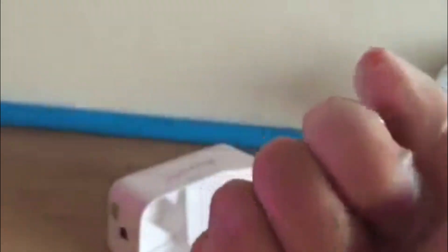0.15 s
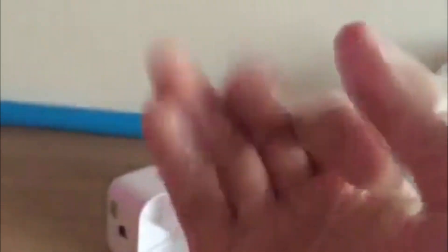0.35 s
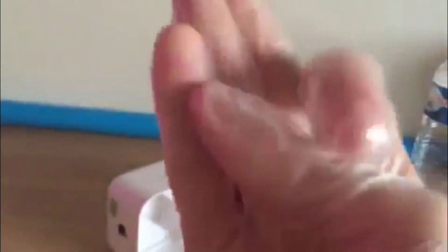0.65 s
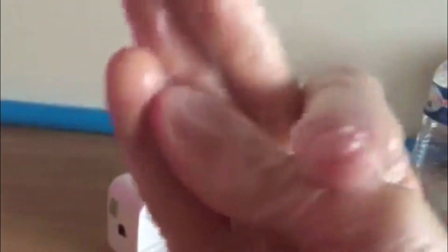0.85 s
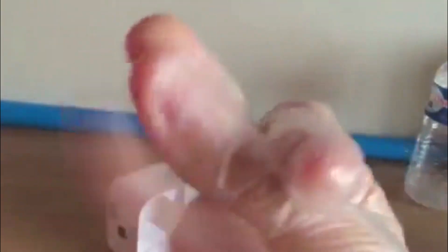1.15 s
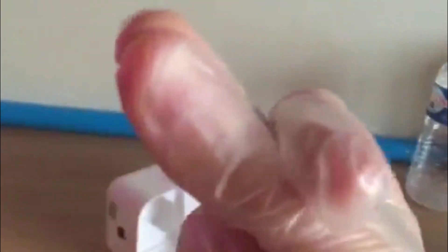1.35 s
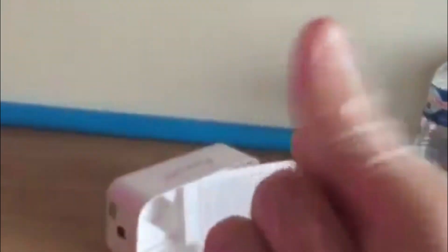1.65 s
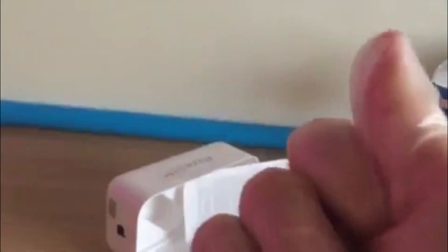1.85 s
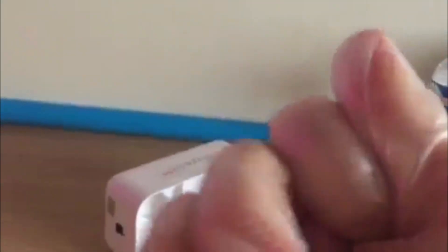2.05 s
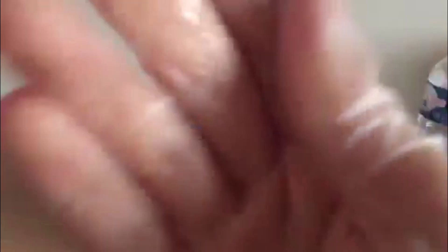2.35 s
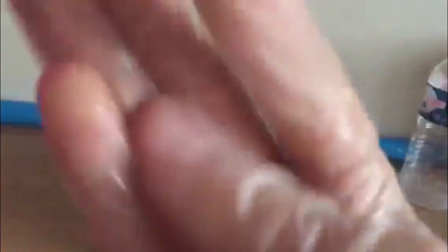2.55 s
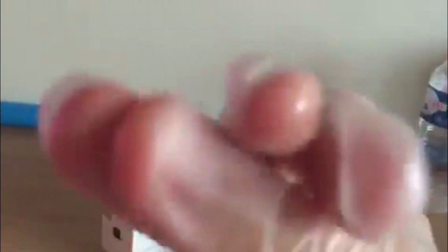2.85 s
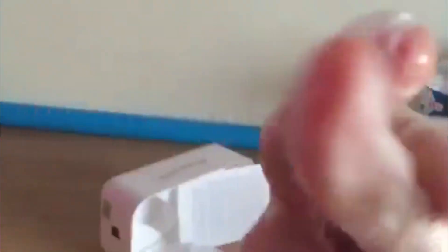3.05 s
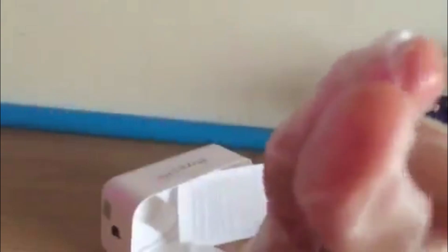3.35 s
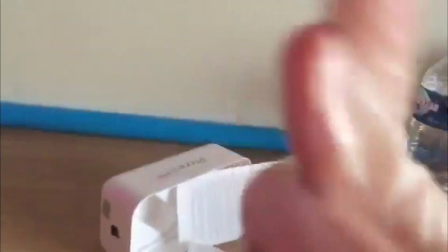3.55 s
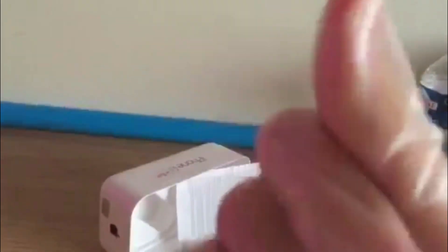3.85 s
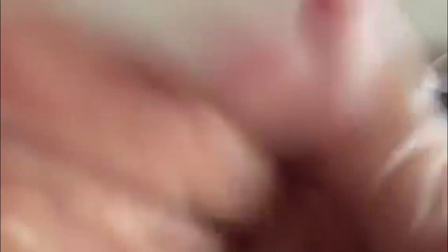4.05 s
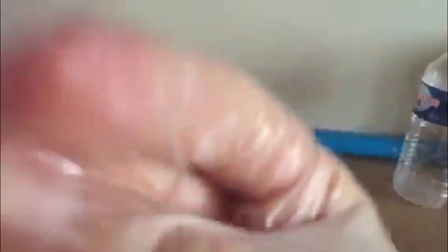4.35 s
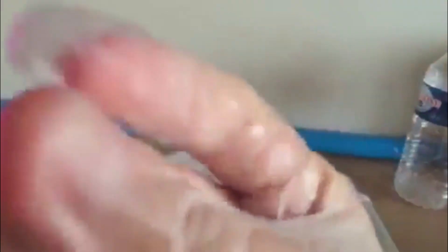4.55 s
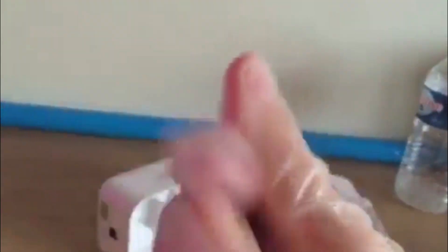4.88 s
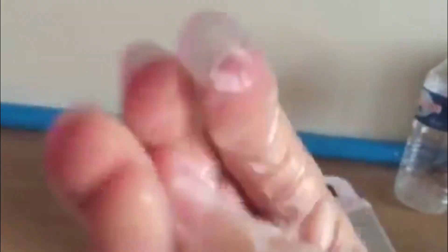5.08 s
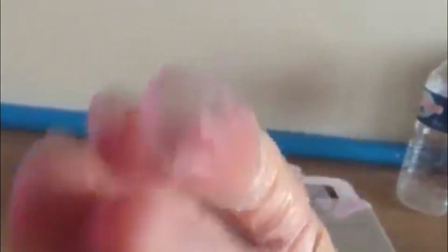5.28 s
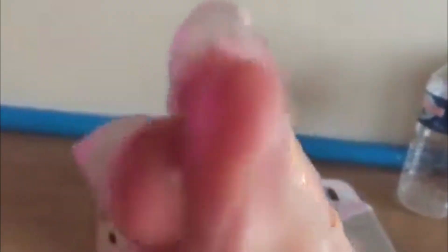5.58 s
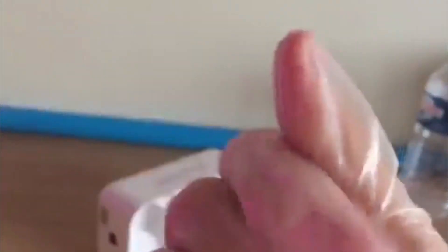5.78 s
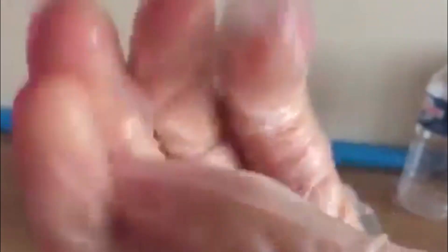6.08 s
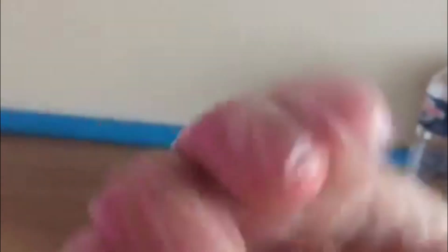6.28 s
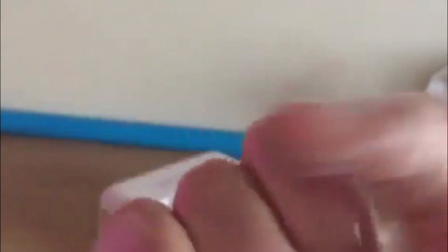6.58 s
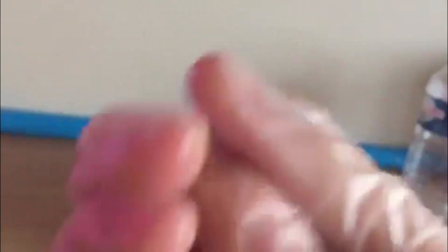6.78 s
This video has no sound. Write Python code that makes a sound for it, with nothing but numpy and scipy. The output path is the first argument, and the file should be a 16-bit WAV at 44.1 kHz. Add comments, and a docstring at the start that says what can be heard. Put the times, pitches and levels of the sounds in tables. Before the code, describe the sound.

Very close to a small phone microphone, fingers in a loose thin plastic glove rub and flick one another. Short swishes of bright, grainy rustle come in uneven bursts, with sharp crackly snaps and occasional low puffs of air. The loudest flick comes about a third of the way in; later the rubbing becomes more continuous. A small quiet room adds faint hum and a short echo.

```python
"""A hand in a thin plastic glove rubs and flicks its fingers close to a phone microphone.
Film slides on film in countless tiny slips: noise with moving level and colour, ringing near 2 kHz in
the cupped palm. Flicks are bursts of the slips, creases snap as decaying sines with a noise tick, and
a finger that lets go pushes a puff of air at the microphone: a low thump, a damped swing of falling
pitch. Room noise and a faint fan hum lie beneath; the hand has a short echo."""
import sys
import numpy as np
from scipy import signal
from scipy.fft import rfft, irfft, next_fast_len
from scipy.io import wavfile
from scipy.ndimage import uniform_filter1d, map_coordinates

SR = 44100
rng = np.random.default_rng(int(sys.argv[2]) if len(sys.argv) > 2 else 0)


def put_to_file(sound):
    """Save the sound as 16-bit audio at rate SR, in the file named by the first command-line argument."""
    columns = np.atleast_2d(sound).T  # one column per channel
    safe = np.clip(columns, -1, 1)
    whole_steps = np.round(safe * 32767)
    wavfile.write(sys.argv[1], SR, whole_steps.astype(np.int16))


N = 305172


def amp(db):
    """Decibels to gain."""
    return 10 ** (np.asarray(db) / 20)


def unit(x):
    """Scale to rms 1."""
    return x / np.sqrt(np.mean(x ** 2) + 1e-20)


def filtered(x, response):
    """Multiply the spectrum of x by response(frequency in Hz)."""
    m = next_fast_len(N + 8192)
    spectrum = rfft(x, m) * response(np.fft.rfftfreq(m, 1 / SR))
    return irfft(spectrum, m)[..., :N]


def colour(points):
    """Gain curve through (frequency [Hz], gain [dB]) points on a log axis."""
    point_hz, gain_db = np.transpose(points)
    return lambda hz: amp(np.interp(np.log(hz + 1), np.log(point_hz + 1), gain_db))


def wobble(knots_per_s):
    """Smooth random curve through normally distributed knots."""
    knots = rng.standard_normal(int(N * knots_per_s / SR) + 4)
    return map_coordinates(knots, [np.arange(N) * knots_per_s / SR])


# room noise spectrum: (frequency [Hz], density [dB per Hz, relative])
ROOM_SPECTRUM = [(25, -8.5), (54, -0.5), (80, -11), (116, -10), (180, -8.5), (270, -5), (350, -8),
                 (450, -19), (730, -18.5), (1200, -19), (1700, -16.5), (2200, -18.5), (2650, -23),
                 (4500, -27), (9500, -31.5), (10500, -33.5), (14500, -38.5), (15800, -47.5)]
# unsteady fan tones: (frequency [Hz], full width at half amplitude [Hz], mean level [dB])
FAN_TONES = [(52, 8, -70), (116.2, 8, -79), (269.2, 14, -69), (548, 4, -87), (1073, 13, -77.5)]


def room_air():
    """Gently wavering room noise plus fan tones, each a narrow band of noise."""
    noise = unit(filtered(rng.standard_normal(N), colour(ROOM_SPECTRUM)))
    out = amp(-64.5 + 1.4 * wobble(2.94)) * noise
    for tone_hz, width_hz, level_db in FAN_TONES:
        tone = filtered(rng.standard_normal(N), lambda f: 1 / (1 + (2 * (f - tone_hz) / width_hz) ** 2))
        out = out + amp(level_db + 0.87 * wobble(6.7)) * unit(tone)
    return out


# puffs of air: (onset [s], peak level [dB], pitch fall [Hz]); pitch ends at 0.44 of the fall
AIR_PUFFS = [(0.056, -52, 100), (1.062, -46.5, 198), (1.255, -42, 102), (1.503, -29.5, 130),
             (1.742, -40.5, 221), (2.315, -20.5, 170), (2.497, -30.5, 121), (2.623, -53, 109),
             (2.798, -41, 153), (2.855, -48, 101), (2.999, -30, 113), (3.568, -48.5, 109),
             (3.803, -55, 111), (4.2, -31.5, 111), (4.425, -49, 100), (4.461, -51, 127), (4.492, -48, 130),
             (4.53, -51.5, 150), (4.698, -36, 175), (5.427, -40.5, 167), (5.711, -47, 128),
             (6.039, -42.5, 108), (6.4, -54, 100), (6.629, -50, 492)]
PUFF_T60_S, PUFF_T60_POWER, PUFF_T60_MIN_S = .12, 2.14, .03  # T60 at 100 Hz; shortening with pitch; limit


def puffs():
    """A low thump: pressure dips, then the microphone rings back in a damped swing of falling pitch."""
    out, t = np.zeros(N + SR), np.arange(SR // 4) / SR
    for onset_s, peak_db, fall_hz in AIR_PUFFS:
        t60_s = max(PUFF_T60_S * (100 / fall_hz) ** PUFF_T60_POWER, PUFF_T60_MIN_S)
        pitch_hz = 0.44 * fall_hz + fall_hz * np.exp(-t / 0.0058)
        swing = -np.sin(2 * np.pi * np.cumsum(pitch_hz) / SR)
        thump = amp(-60 * t / t60_s) * (1 - np.exp(-t / 0.0036)) * swing
        out[round(onset_s * SR):][:len(t)] += amp(peak_db) * thump / np.max(np.abs(thump))
    return out[:N]


# creases that pop: (onset [s], peak level before the bass cut [dB], pitch [Hz])
CREASE_SNAPS = [(0.262, -29.5, 2600), (0.3982, -54, 5700), (0.5231, -47, 6200), (0.526, -38.5, 7800),
                (0.5377, -49, 3600), (0.5657, -47.5, 4400), (1.0054, -42, 2390), (1.105, -43, 2300),
                (1.394, -43, 2100), (1.401, -40, 2200), (1.4386, -45, 3900), (1.4576, -43, 2200),
                (1.4975, -15, 5800), (1.5003, -18, 2250), (1.5045, -15.5, 5870), (1.743, -22, 2030),
                (1.9676, -50, 3300), (2.0257, -41, 5400), (2.2464, -44, 4600), (2.3095, -14, 2840),
                (2.3145, -7, 1440), (2.324, -15.5, 6500), (2.3627, -39, 5900), (2.4012, -34.5, 2650),
                (2.4734, -31, 7400), (2.4943, -21.5, 6400), (2.561, -30, 8000), (2.5694, -38, 4300),
                (2.9555, -35.5, 5470), (2.9974, -17.5, 4150), (3, -24, 3800), (3.0782, -41, 5800),
                (3.4548, -39, 6800), (3.5582, -8, 7100), (3.56, -9.5, 7000), (4.0663, -35, 2400),
                (4.0938, -32, 2300), (4.11, -35, 1200), (4.151, -36, 1200), (4.572, -26, 5700),
                (4.6924, -14.5, 9300), (4.7048, -30.5, 2960), (4.879, -42, 4300), (4.9545, -45, 5500),
                (5.163, -31.5, 2080), (5.427, -21.5, 2400), (5.457, -30.5, 7100), (5.8185, -35, 4500),
                (5.8372, -41, 2300), (6.1719, -43, 8000), (6.3184, -43, 7900), (6.467, -32.5, 2000),
                (6.6607, -23, 2340), (6.7281, -27, 2200), (6.866, -42, 3500)]


def snaps():
    """A crease buckles: a ring of a few cycles and a sharp tick; thin film radiates no bass."""
    out, t = np.zeros(N + SR), np.arange(SR // 100) / SR
    for onset_s, peak_db, hz in CREASE_SNAPS:
        life_s = .0001 + 0.3 / hz
        ring = np.sin(2 * np.pi * hz * t) * np.exp(-t / life_s) * (1 - np.exp(-3 * hz * t))
        sharpness = hz / 12000  # small creases tick, large ones knock
        tick = np.exp(-t / 0.00016) * rng.standard_normal(len(t))
        pop = ring + sharpness * tick
        out[round(onset_s * SR):][:len(t)] += amp(peak_db) * pop / np.max(np.abs(pop))
    return filtered(out[:N], lambda f: (1j * f / (500 + 1j * f)) ** 2)


def slips(spread_db, clump_db):
    """A random slip at every sample, most of them tiny, a few large, in clumps."""
    rank = np.minimum(rng.exponential(size=N), 4)
    clumps = wobble(45) + wobble(300)
    return amp(spread_db * rank + clump_db * clumps) * rng.standard_normal(N)


def patchy(x, depth_db):
    """Folds come and go: the colour changes in broad and narrow patches of time and pitch."""
    z = signal.stft(x, nperseg=512)[2]
    broad, narrow = rng.standard_normal((2, *z.shape))
    broad = uniform_filter1d(uniform_filter1d(broad, size=24, axis=0), size=10, axis=1)
    narrow = uniform_filter1d(uniform_filter1d(narrow, size=3, axis=0), size=6, axis=1)
    gain = amp(depth_db * (0.73 * unit(broad) + 0.95 * unit(narrow)))
    return signal.istft(z * gain, nperseg=512)[1][:N]


# film on film, also played by rubbing(): (frequency [Hz], density [dB per Hz, relative])
FILM_SPECTRUM = [(500, -49), (1200, -24.5), (2000, -23), (3000, -1.5), (4500, -1), (6000, 1.5), (9000, 2.5),
                 (10400, -0.5), (11700, 1), (14500, -5), (15200, -8.5), (15800, -14)]
# flesh and palm under a flick: (frequency [Hz], density [dB per Hz, relative])
BODY_SPECTRUM = [(150, -24), (300, -2), (600, -5.5), (1000, -1.5), (2000, 1.5), (3000, -4.5), (4000, -21),
                 (6000, -45.5)]
# stick, tear loose, stop:
# (peak time [s], film level [dB], swell [s], dying [s], body over film level [dB])
FINGER_FLICKS = [(0.099, -37.5, 0.042, .05, -24), (0.651, -37, 0.0099, 0.013, -4.5),
                 (.735, -45.5, 0.038, .02, -2.5), (1.061, -41.5, 0.021, 0.015, -4.5),
                 (1.246, -39, 0.012, 0.014, -6.5), (1.504, -31.5, 0.018, 0.0095, -3.5),
                 (1.743, -41.5, 0.0018, 0.0087, 5.5), (2.309, -29, 0.014, .012, 0.5),
                 (2.313, -31, 0.0028, 0.0089, 9.5), (2.498, -35, .012, 0.018, -5),
                 (2.612, -34, .004, 0.017, -25), (2.798, -38.5, .003, 0.012, -9),
                 (2.846, -52.5, 0.0052, 0.019, 5.5), (3, -38, 0.025, .01, -1),
                 (3.102, -52.5, .002, .012, -18), (3.551, -34, 0.0091, 0.0088, -4),
                 (3.562, -30.5, 0.0046, 0.0093, -6.5), (3.798, -39, 0.0051, 0.013, -6.5),
                 (3.945, -43, 0.013, 0.0065, -22), (4.033, -34.5, 0.014, .01, -16),
                 (4.045, -55.5, 0.0054, 0.0092, 5.5), (4.15, -48, 0.079, 0.048, -0.5),
                 (4.198, -33, 0.029, 0.0049, -7.5), (4.703, -37, 0.013, 0.0071, 2),
                 (5.215, -52, .006, 0.0092, -8), (5.427, -34.5, 0.01, 0.0073, -8),
                 (5.716, -36.5, 0.018, 0.013, -3), (6.034, -38.5, 0.027, .01, -12.5),
                 (6.44, -46, 0.0081, .02, -17), (6.519, -41.5, .003, 0.015, -14),
                 (6.66, -47.5, .004, .008, 4.5), (6.632, -46, 0.014, 0.018, 0.5),
                 (6.74, -49, 0.023, 0.023, -18)]
FLICK_TREBLE_DB = 2  # tearing loose is brighter than sliding; full lift from 9 kHz


def flicks():
    """Slips pile up fast as the finger tears loose and die when it stops."""
    t = np.arange(N) / SR
    grain = slips(spread_db=3.5, clump_db=3)
    film = unit(patchy(filtered(grain, colour(FILM_SPECTRUM)), depth_db=-1.0))
    film = filtered(film, colour([(6000, 0), (9000, FLICK_TREBLE_DB)]))
    film = unit(film)
    body = unit(filtered(grain, colour(BODY_SPECTRUM)))
    out = np.zeros(N)
    for peak_s, level_db, swell_s, dying_s, body_db in FINGER_FLICKS:
        near = slice(max(round((peak_s - .15) * SR), 0), round((peak_s + .15) * SR))
        late_s = t[near] - peak_s
        # 20 dB per swell or dying time
        shape = amp(-20 * np.where(late_s < 0, -late_s / swell_s, late_s / dying_s))
        out[near] += amp(level_db) * shape * (film[near] + amp(body_db) * body[near])
    return out


def hollow(grain, pitch_hz, half_width_hz):
    """Moving resonance: shift its pitch to zero, smooth, shift back."""
    phase = 2 * np.pi * np.cumsum(pitch_hz) / SR
    carriers = np.array([np.cos(phase), np.sin(phase)])
    smooth = filtered(carriers * grain, lambda hz: 1 / (1 + (hz / half_width_hz) ** 2.22))
    return unit(np.sum(carriers * smooth, axis=0))


# film on film: (time at full speed [s], swell [s], hold [s], dying [s], rub level [dB],
# fine treble over rub [dB], palm hollow over rub [dB], mean hollow pitch [Hz])
FILM_STROKES = [(0.08, 0.074, 0.058, 0.087, -46, -12.5, -4.5, 1900),
                (0.266, 0.035, 0.057, 0.077, -46, -7, -6, 2070),
                (0.45, 0.04, 0.011, 0.048, -62.5, 2.5, 3.5, 1890),
                (0.512, 0.032, 0.035, 0.066, -68.5, -2, -1, 1800),
                (0.651, 0.027, 0.0094, 0.05, -46, 2, 2, 2010),
                (0.711, 0.039, 0.021, 0.065, -40, -9.5, -6, 2010),
                (0.835, 0.055, 0.032, 0.066, -59, -1, 2, 2080),
                (1.045, 0.038, 0.011, 0.062, -50.5, 2.5, 0.5, 1980),
                (1.151, 0.049, 0.038, 0.067, -58, -0.5, 2.5, 2150),
                (1.24, 0.027, 0.013, 0.065, -54.5, 2, -1.5, 1970.0),
                (1.368, 0.036, 0.013, 0.056, -63.5, 4, 13.5, 2180.0),
                (1.468, 0.025, 0.015, 0.05, -66.5, -1, 15, 2120),
                (1.496, 0.021, 0.0049, 0.034, -42, 3, 1.5, 1900.0),
                (1.51, 0.03, 0.011, 0.052, -60, -20, 3.5, 1830),
                (1.741, 0.014, 0.027, 0.069, -43.5, -6, -2.5, 1690),
                (1.948, 0.062, 0.023, 0.076, -65, 5, 9.5, 1900),
                (2.302, 0.017, 0.01, 0.041, -37.5, -4, -6, 1890),
                (2.358, 0.03, 0.028, 0.077, -60, -10, -3.5, 1990.0),
                (2.487, 0.039, 0.007, 0.047, -48, 1.5, -5, 2030.0),
                (2.614, 0.051, 0.031, 0.054, -51, 5.5, -6.5, 2140),
                (2.728, 0.03, 0.046, 0.057, -58.5, 5, -17, 2090.0),
                (2.808, 0.035, 0.054, 0.06, -47.5, 1.5, -8.5, 2050.0),
                (2.995, 0.028, 0.0054, 0.043, -45, 0, -1.5, 2190),
                (3.026, 0.03, 0.018, 0.055, -57, -3, -11, 2200.0),
                (3.103, 0.041, 0.028, 0.042, -53, 1.5, 4, 2160),
                (3.477, 0.024, 0.013, 0.058, -54, -5, -17, 1880.0),
                (3.549, 0.028, 0.008, 0.039, -45.5, -1, -8.5, 1980),
                (3.615, 0.04, 0.034, 0.046, -51.5, 0.5, -9.5, 1940.0),
                (3.794, 0.0096, 0.0051, 0.035, -51, -2, -1, 1780),
                (3.893, 0.019, 0.019, 0.051, -57.5, 4.5, -8, 2020.0),
                (3.937, 0.028, 0.0093, 0.061, -44.5, -7.5, -7, 2140),
                (4.021, 0.061, 0.019, 0.072, -47, -6, -5, 2100),
                (4.162, 0.072, 0.021, 0.061, -41.5, -0.5, -7.5, 2100),
                (4.284, 0.05, 0.026, 0.041, -56.5, 0, -13, 2020),
                (4.421, 0.022, 0.05, 0.067, -51, 0.5, -5.5, 2050),
                (4.514, 0.05, 0.028, 0.07, -50, 2, -15.5, 2030),
                (4.611, 0.048, 0.012, 0.038, -51.5, -5.5, -7.5, 2160.0),
                (4.695, 0.019, 0.012, 0.05, -46.5, -2.5, -4.5, 2090),
                (4.805, 0.042, 0.015, 0.064, -52.5, 1, -2.5, 1910),
                (4.9, 0.02, 0.0084, 0.048, -67.5, -9, 8, 1770),
                (4.98, 0.048, 0.065, 0.073, -53, -4, -2, 2200),
                (5.09, 0.068, 0.035, 0.065, -51, 5, -5, 2000),
                (5.213, 0.044, 0.014, 0.037, -52, 3, -8, 1950),
                (5.382, 0.086, 0.015, 0.05, -59.5, 5, -2.5, 1940),
                (5.414, 0.025, 0.0059, 0.049, -51.5, 6, 1.5, 1830),
                (5.469, 0.032, 0.041, 0.059, -60, -6, -10, 2150.0),
                (5.681, 0.011, 0.015, 0.049, -48.5, -1, -8, 2040),
                (5.703, 0.018, 0.0068, 0.067, -47.5, 2, -3, 2110.0),
                (5.802, 0.034, 0.011, 0.043, -52, -14, -2.5, 2070.0),
                (5.93, 0.079, 0.066, 0.064, -57.5, -13, -2, 2130.0),
                (6.013, 0.067, 0.026, 0.079, -50, 3, -5, 2080),
                (6.128, 0.044, 0.017, 0.038, -50, 3.5, -10, 2090),
                (6.213, 0.018, 0.012, 0.051, -52, 1, -0.5, 1920),
                (6.336, 0.022, 0.037, 0.059, -46.5, -0.5, -2.5, 1980),
                (6.435, 0.036, 0.023, 0.053, -49.5, 7.5, -0.5, 1970),
                (6.518, 0.027, 0.017, 0.066, -45.5, -9, 1.5, 2100),
                (6.625, 0.065, 0.026, 0.055, -45, -3.5, -2.5, 2020),
                (6.694, 0.033, 0.013, 0.05, -40.5, -4.5, -7, 2200.0),
                (6.732, 0.032, 0.021, 0.046, -38.5, -8.5, 2, 2080.0),
                (6.813, 0.031, 0.049, 0.077, -67.5, -4, 14, 1970),
                (6.918, 0.032, 0.015, 0.05, -54.5, -3, 7, 2070)]
ROUNDING = 1.22  # power of time: a stroke eases in and out of full speed
RESTING_DB = -83.5  # the film never lies quite still between strokes


def strokes():
    """Rub, fine and hollow levels [dB] and hollow pitch [Hz]: strokes swell, hold, die and overlap."""
    t = np.arange(N) / SR
    power, pitch_sum = np.full((3, N), 1e-12), np.full(N, 2e-9)
    for full_s, swell_s, hold_s, dying_s, rub_db, fine_db, hollow_db, hz in FILM_STROKES:
        near = slice(max(round((full_s - .4) * SR), 0), round((full_s + .5) * SR))
        late_s = t[near] - full_s
        away = np.maximum(-late_s / swell_s, (late_s - hold_s) / dying_s)
        lost_db = 20 * np.maximum(away, 0) ** ROUNDING  # 20 dB at one swell or dying time
        share = amp(rub_db - lost_db + np.array([[0], [fine_db], [hollow_db]])) ** 2
        power[:, near] += share
        pitch_sum[near] += hz * share[2]  # pitch weighted by hollow power
    levels_db = 10 * np.log10(power + amp(RESTING_DB) ** 2)
    return (*levels_db, pitch_sum / power[2])


def rubbing():
    """The same slips sound as hiss, as fine treble and through the hollow of the palm."""
    rub_db, fine_db, hollow_db, hollow_hz = strokes()
    grain = slips(spread_db=2.0, clump_db=1.5)
    film = patchy(filtered(grain, colour(FILM_SPECTRUM)), depth_db=2.5)
    coarse = filtered(film, lambda hz: 1 / (1 + (hz / 7500) ** 6))
    fine = film - coarse
    hollow_hz = hollow_hz * (1 + .025 * wobble(35))  # the fingers never hold still
    hollow_db = hollow_db + 1.64 * wobble(40)
    squeeze = np.clip((hollow_db + 44) / 18, 0, 1)  # a hard squeeze damps the hollow: wider, higher
    open_ring = hollow(grain, hollow_hz, half_width_hz=288)
    damped_ring = hollow(grain, 1.26 * hollow_hz, half_width_hz=580)
    ring = (1 - 0.22 * squeeze) * open_ring + 0.42 * squeeze * damped_ring
    hiss = amp(rub_db) * unit(coarse) + amp(fine_db) * unit(fine)
    return hiss + amp(hollow_db) * patchy(ring, depth_db=2.5)


def echo(x, t60_s):
    """The table and walls answer with a short fading noise tail of unit energy."""
    t = np.arange(SR // 3) / SR
    tail = amp(-60 * t / t60_s) * rng.standard_normal(len(t)) * (t > .002)
    return signal.fftconvolve(x, tail / np.linalg.norm(tail))[:N]


def scene():
    """The room, the puffs at the microphone, the hand and its echo."""
    background = room_air() + puffs()
    hand = snaps() + flicks() + rubbing()
    return (background + hand + amp(-19.5) * echo(hand, t60_s=0.23))[None]


TOP_HZ = 15850


def record(dry):
    """The phone cuts the deepest bass and keeps nothing from TOP_HZ up."""
    return filtered(dry, lambda hz: (hz < TOP_HZ) * hz ** 4 / (hz ** 4 + 38 ** 4))


dry = scene()
out = record(dry)
put_to_file(out)
```